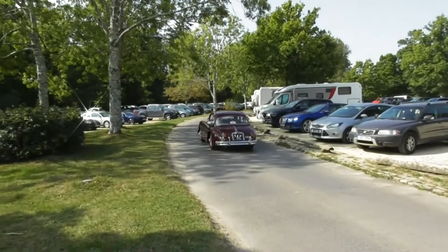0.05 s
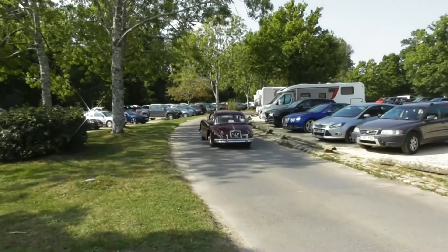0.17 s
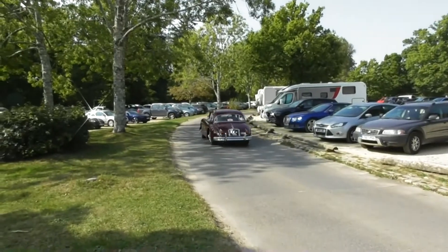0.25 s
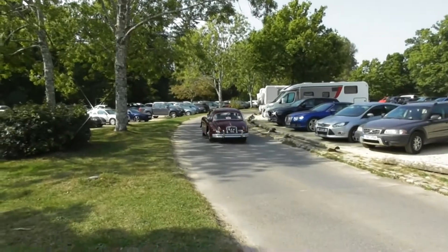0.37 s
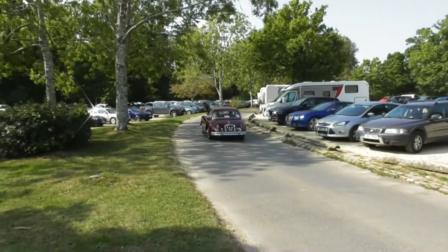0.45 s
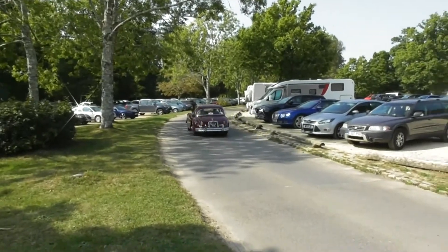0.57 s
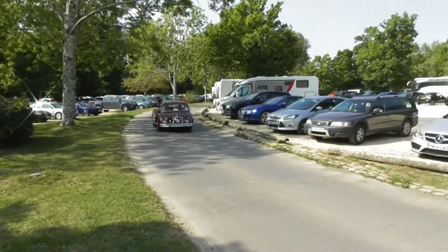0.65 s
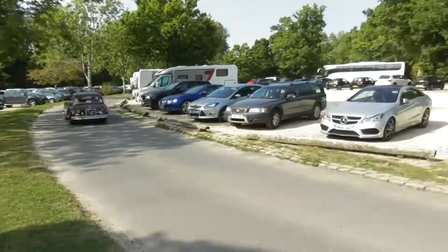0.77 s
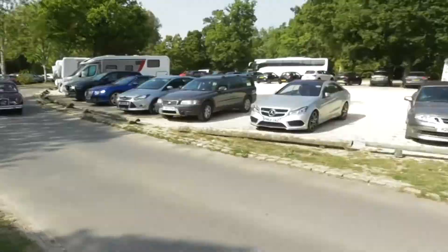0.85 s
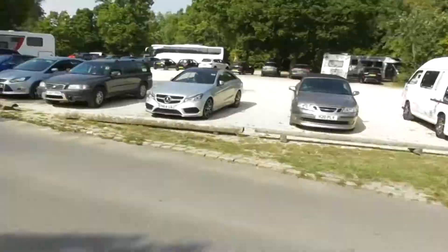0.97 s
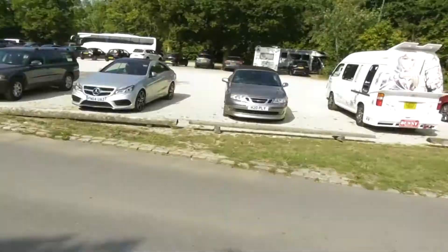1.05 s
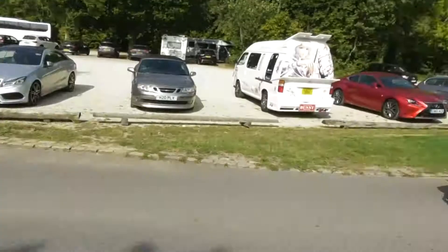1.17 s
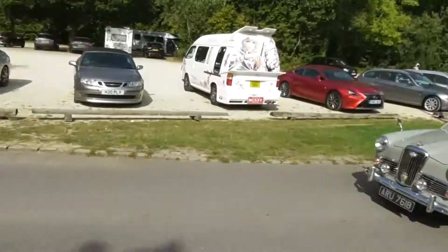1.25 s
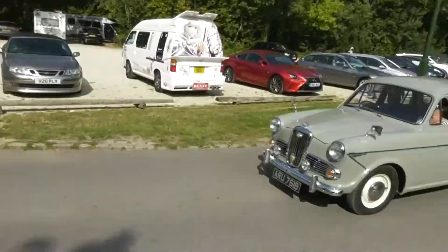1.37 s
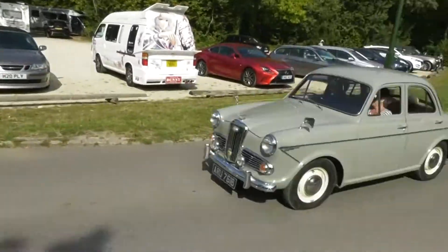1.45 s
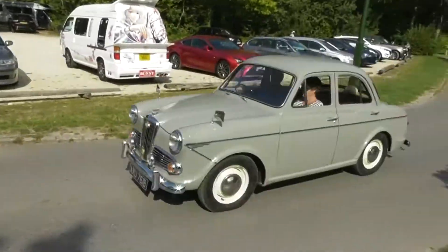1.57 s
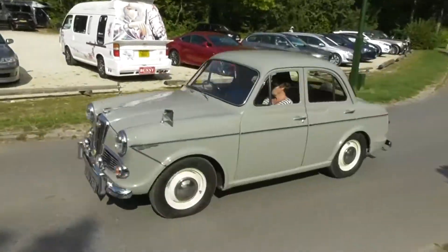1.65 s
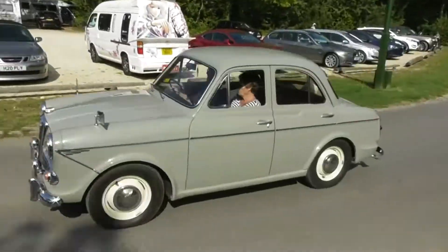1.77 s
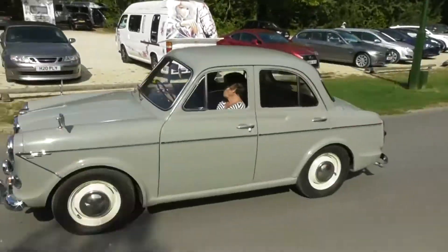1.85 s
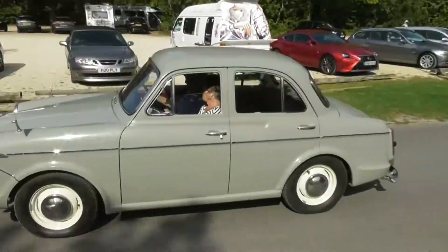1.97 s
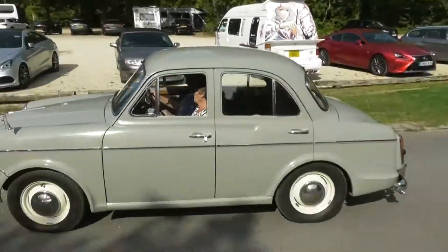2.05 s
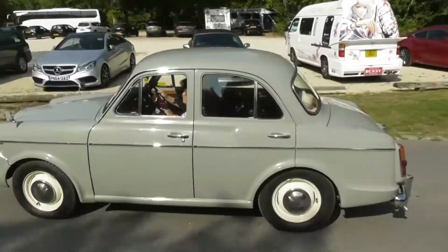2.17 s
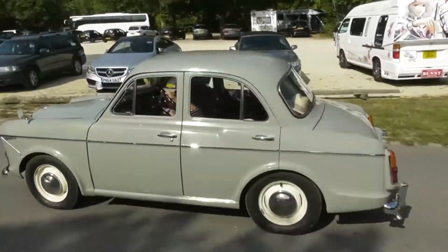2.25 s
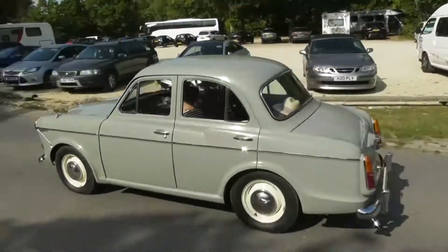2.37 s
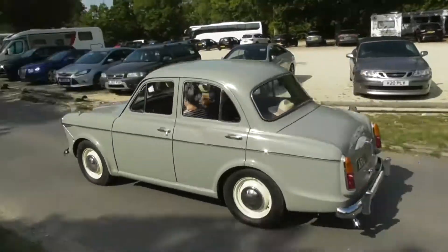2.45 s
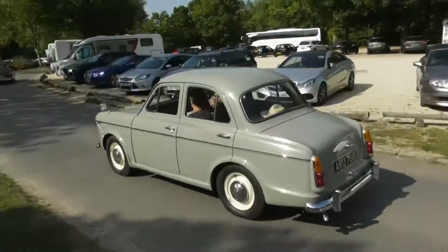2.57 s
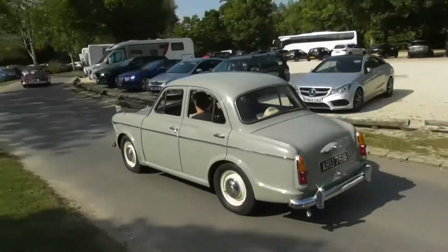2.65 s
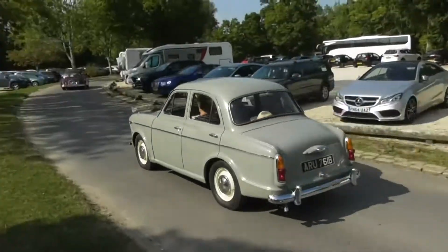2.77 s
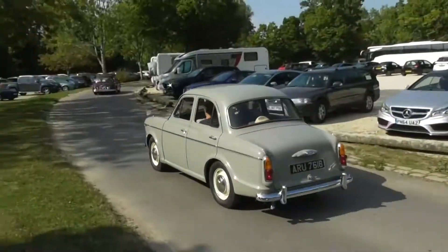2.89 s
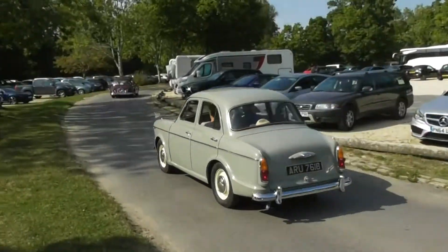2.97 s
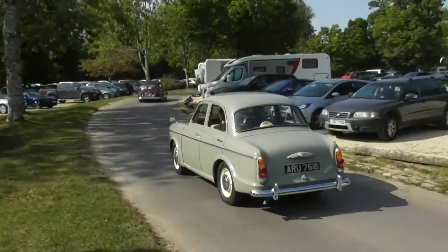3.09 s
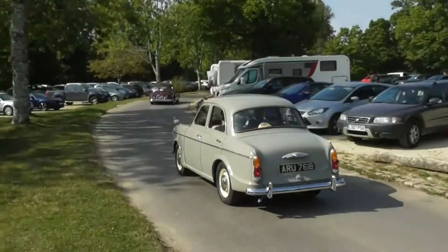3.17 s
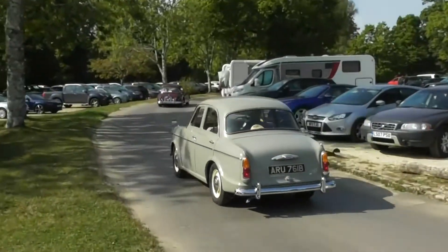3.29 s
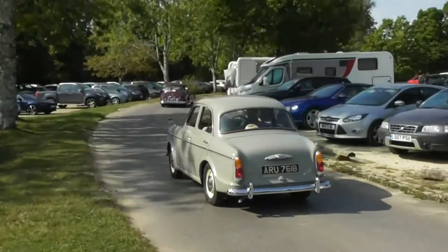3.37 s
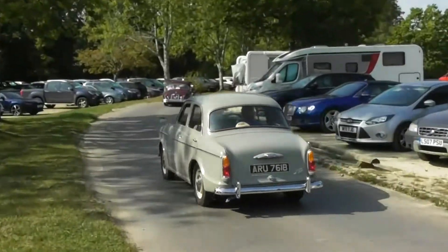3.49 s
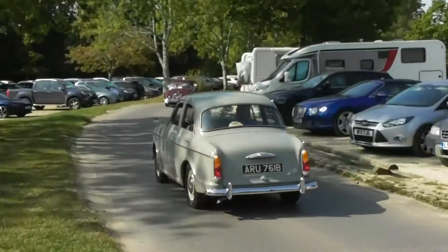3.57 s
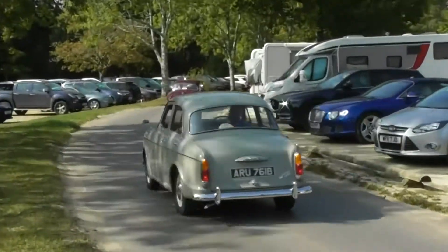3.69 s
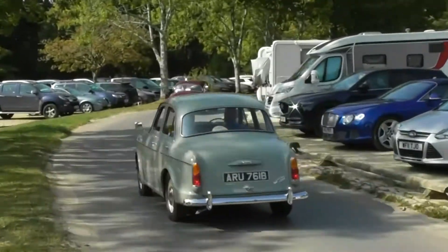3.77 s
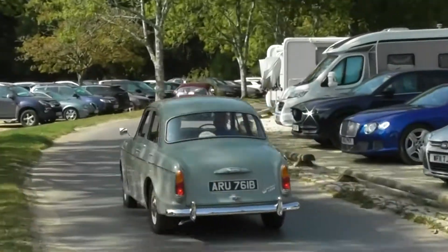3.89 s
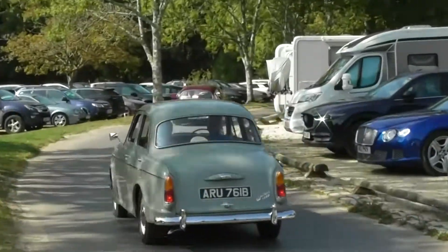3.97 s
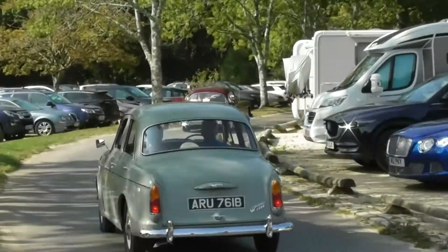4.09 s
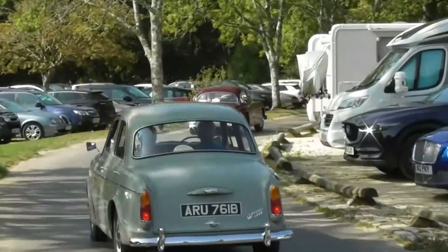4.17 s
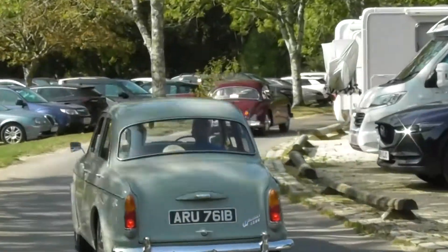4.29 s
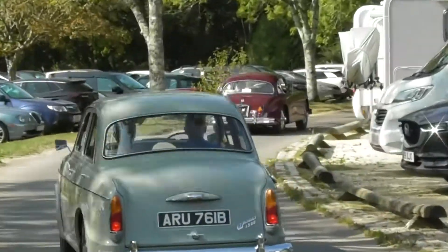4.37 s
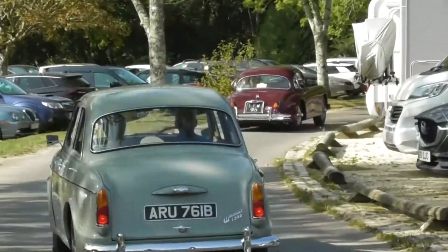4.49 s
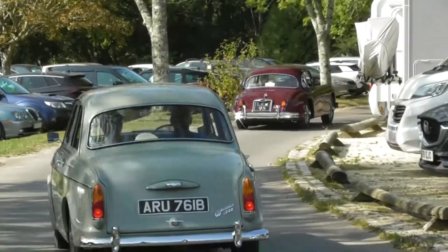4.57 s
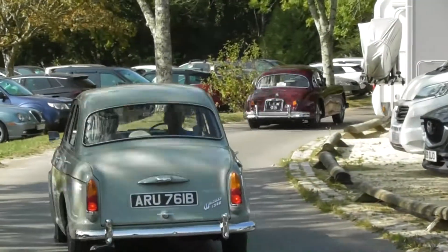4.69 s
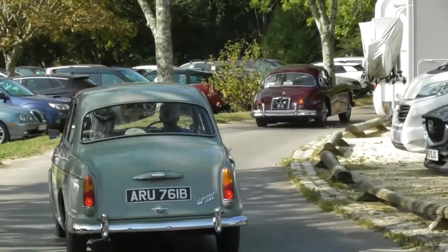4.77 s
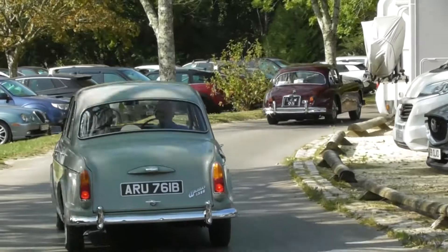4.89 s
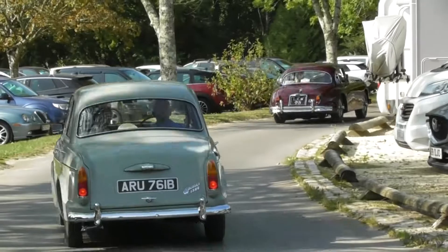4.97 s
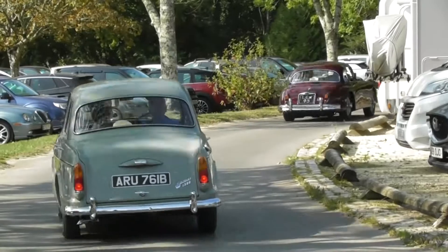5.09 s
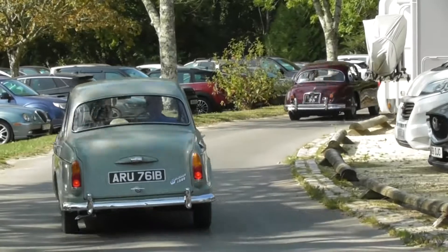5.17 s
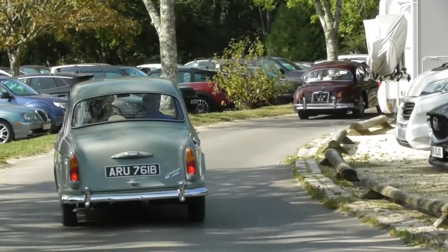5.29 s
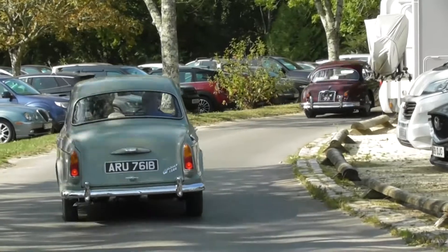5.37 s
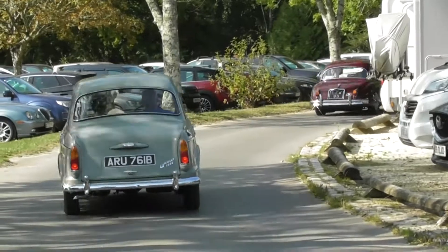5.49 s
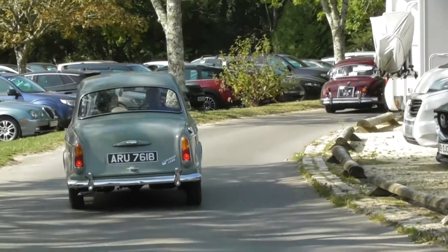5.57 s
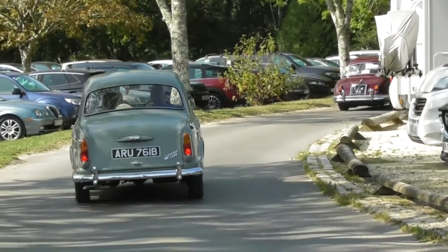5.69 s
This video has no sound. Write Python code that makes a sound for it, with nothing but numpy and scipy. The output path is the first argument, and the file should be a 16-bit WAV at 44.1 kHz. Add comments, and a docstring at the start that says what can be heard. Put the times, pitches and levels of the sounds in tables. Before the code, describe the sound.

A vintage saloon rolls slowly past a stereo microphone beside an outdoor road, its low engine note and tyre noise swelling and fading. A second engine throbs along with it, slowly gaining speed, over far traffic. Once the saloon has gone by, its exhaust spits quick, hissy puffs that gradually recede. Late on, a piece of gravel cracks under a tyre while a third engine revs up farther off.

```python
"""A park road in the open air, stereo microphone at the verge, old cars creeping by over a far drone.
A four-cylinder saloon passes close at idle speed, tyres rushing, fan singing; the microphone swings
round to face it. Once its tail is in view, the leaky exhaust chuffs at every firing. A second engine
slowly gains speed and beats against the first. Dull bumps come from the road early on; near the end
a third engine revs up in the distance and a stone snaps under a tyre."""
import sys
import numpy as np
from scipy import signal
from scipy.fft import rfft, irfft
from scipy.io import wavfile

SR = 44100
rng = np.random.default_rng(int(sys.argv[2]) if len(sys.argv) > 2 else 0)


def int16_out(signal):
    """Quantize to a 16-bit WAV file."""
    q = np.round(np.clip(np.atleast_2d(signal).T, -1, 1) * 32767)
    wavfile.write(sys.argv[1], SR, q.astype(np.int16))


N = 253134
TIME = np.arange(N) / SR
BINS_HZ = np.maximum(np.arange(N // 2 + 1) * SR / N, 1)
TURN_S, TURN_WIDTH_S = 1, .24   # the microphone swings round to the saloon
REAR_S, REAR_WIDTH_S, REAR_SHARE, REAR_FADE_S = 2.326, 0.09, 0.79, 6   # its tail comes into view

# stereo width at the microphone: (frequency [Hz], side minus mid [dB])
STEREO_WIDTH = [(30, -23), (60, -24), (130, -16), (290, -13.5), (640, -10), (1400, -8.5), (3100, -14),
                (5500, -44), (8500, -11.5), (14000, -0.5)]
# engine speeds: (time [s], firing rate [Hz])
SALOON_RATE = [(0, 32.772), (.9085, 33.594), (1.942, 33.331), (2.949, 32.415), (5.74, 32.082)]
SECOND_RATE = [(0, 30.206), (.4, 29.827), (1.109, 30.481), (2.042, 33.059), (3.118, 34.727),
               (4.046, 35.068), (5.74, 34.861)]
# the second car's exhaust from the verge: (time [s], gain [dB])
SECOND_LEVEL = [(0, -36.5), (.7, -40.5), (1.3, -35.5), (1.8, -35.5), (2.12, -30.5), (2.6, -37.5),
                (3.8, -38.3), (5.2, -42.5), (5.74, -50.5)]
# each car's silencer: (frequency [Hz], gain [dB])
SALOON_PIPE = [(33, -24), (66, -23), (100, -19.5), (131, 1), (165, -2), (197, -13.5), (230, -19.5),
               (265, -27.5), (295, -31), (328, -30), (400, -47)]
SECOND_PIPE = [(32, -38), (62, -15), (95, -35.5), (121, -1), (137, -0.5), (150, 1), (177, -7), (208, -10.5),
               (240, -33.5), (272, -9), (305, -28.5), (400, -32.5)]
DISTANT_PIPE = [(55, -16), (70, -9), (88, -6), (115, 4), (145, -7), (175, -9), (205, -28), (228, -1),
                (262, -22), (400, -44)]
# how each part of the saloon passes the microphone:
# (time abreast [s], peak gain [dB], swell [s], fade [s], shade before the turn [dB])
EXHAUST_PASS = (2.5, -32, 0.22, 0.38, 14)
TYRES_PASS = (1.58, -44, 0.74, 0.6244, 6.5)
BAY_PASS = (1.6, -42.5, 0.3, .6, 4)
BODY_PASS = (2, -40.5, 0.96, 0.59, 4)
TREAD_PASS = (1.4, -55, 10, 0.48, 12.5)
LEAK_PASS = (2.5, -46, .52, 0.56, 14.5)
TAIL_PASS = (2.5, -44, 5, 0.25, 0)
# rush, growl and rumble of the cars farther off: (starting gain [dB], fall [dB/s])
FAR_CARS = [(-56.5, 1), (-51, 0.34), (-49.5, 1.5)]
# noise colours: (frequency [Hz], relative density [dB])
FAR_DRONE = [(20, -35), (31, -3), (46, -2.5), (56, -9), (74, -1.5), (80, 7.5), (85, -6.5), (90, 8),
             (98, -5), (140, -3.5), (250, -16), (600, -21.5)]
TYRE_RUSH = [(530, -16), (900, -2.5), (1020, -5), (1430, -3), (2020, -5), (2820, -8.5), (3970, -14.5),
             (5000, -20.5), (6500, -20), (11000, -120)]
TREAD_SIZZLE = [(3800, -15), (4800, 8.5), (6300, 6), (7500, 17), (10000, 6), (12500, 3), (16000, 1)]
BAY_GROWL = [(330, -42), (400, -4.5), (500, 0.5), (600, 2.5), (700, 0), (780, -3), (870, -13), (940, -6),
             (1020, -9.5)]
BODY_RUMBLE = [(100, 6), (130, -0.5), (170, 6.5), (220, 2), (300, 0), (350, -5.5), (390, -11.5),
               (480, -21.5)]
FAN_TONE = [(780, -16), (860, 3), (890, -2.5), (960, -14), (1900, -18), (2700, -12.5), (3400, -31)]
BUMP_TONE = [(270, -13), (320, 1), (400, 1), (450, -14)]
LEAK_DIRECT = [(3500, -38), (4700, -16), (5400, -4), (6500, -4), (7600, 3), (8500, 5), (9400, -6.5),
               (10500, -2.5), (11500, -10), (12500, -14), (16000, -19)]   # straight from the hole
LEAK_SCATTERED = [(3000, -43), (4700, -12), (5400, -5), (6000, -6), (6600, -6), (7600, -1), (8500, -2.5),
                  (9400, -6.5), (10400, -11.5), (11500, -17.5), (12500, -19), (16000, -29)]   # by way of road and body
STONE_RING = [(3500, 2), (4200, -1), (5600, 1), (7000, -2), (8400, 3), (11000, -18), (15000, -37)]
# bumps from the road: (time [s], level [dB], length [s])
BUMPS = [(.56, -49.5, .02), (.625, -40, 0.02), (0.744, -54, .02), (0.816, -51.5, 0.039)]
# each cylinder's puff at the leak: (relative level [dB])
CYLINDERS_DB = [14.1, 9.1, 10.3, 9.2]
# firings that spit harder than the rest: (time [s], extra level [dB])
HARD_PUFFS = [(2.528, 1.5), (2.558, 1.5), (2.651, 2.5), (2.682, 5), (2.805, 4.5), (2.989, 5), (3.02, 3),
              (3.051, 5), (3.39, 2.5), (3.483, 5.5), (3.513, 3.5), (3.576, 3.5), (3.885, 0.5), (5.004, 6),
              (5.035, 6.5), (5.408, 4.5), (5.656, 6.5)]
# underbody and tailpipe resonances from behind: (frequency [Hz], width [Hz], relative level [dB])
TAIL_MODES = [(573, 250, -2.5), (687, 25, 2.5), (970, 66, -3), (1150, 320, -6.5), (1737, 210, -6),
              (1921, 40, -5.5), (2427, 340, -13), (2984, 220, -14.5)]
# a stone crunches, then snaps: (time [s], level before the low cut [dB], decay [s], low cut [Hz])
STONE_BURSTS = [(4.379, -46, 0.0044, 5800), (4.3836, -40, 0.0043, 5500), (4.386, -29.5, 0.0011, 3800)]
# the knock that goes with the snap: (frequency [Hz], level [dB], decay [s])
STONE_KNOCK = [(644, -53, .003), (910, -33, 0.0029), (1260, -36.5, 0.0036), (1950, -35, 0.0021),
               (2440, -32.5, 0.002), (4240, -37, 0.0028)]


def from_db(db):
    """Decibels to gain."""
    return 10 ** (np.asarray(db) / 20)


def rms_one(x):
    """Scale to unit power."""
    return x / np.sqrt(np.mean(x ** 2) + 1e-20)


def in_time(curve):
    """A curve's value at every sample."""
    return np.interp(TIME, *np.transpose(curve))


def at_hz(spectrum, hz):
    """Read a spectrum on a log-frequency axis."""
    points_hz, db = np.transpose(spectrum)
    return np.interp(np.log(hz), np.log(points_hz), db)


def gains(spectrum):
    """Gain at every frequency, falling steeply beyond the spectrum's ends."""
    (low, low_db), (high, high_db) = spectrum[0], spectrum[-1]
    skirted = [(low / 8, low_db - 90), *spectrum, (high * 8, high_db - 90)]
    return from_db(at_hz(skirted, BINS_HZ))


def colour(x, spectrum):
    """Give a signal a spectrum, at unit power."""
    return rms_one(irfft(rfft(x) * gains(spectrum), N))


def wide_noise(spectrum):
    """Coloured stereo noise, nearly mono in the bass."""
    bins = rng.standard_normal((2, len(BINS_HZ), 2)) @ [1, 1j] * gains(spectrum)
    mid, side = irfft([bins[0], bins[1] * from_db(at_hz(STEREO_WIDTH, BINS_HZ))], N)
    return (mid + side * [[1], [-1]]) / np.std(mid)


def drift(rate_hz, step=32):
    """A slow random wander with spread 1."""
    hz = BINS_HZ[:N // step // 2 + 1]
    bins = rng.standard_normal(len(hz)) + 1j * rng.standard_normal(len(hz))
    slow = irfft(bins / (1 + (hz / rate_hz) ** 4))
    return np.interp(np.arange(N) / step, np.arange(len(slow)), rms_one(slow))


def pan(x, right_db):
    """Lean a sound to the right."""
    return x * from_db(np.array([[-.5], [.5]]) * right_db)


def after(s, width_s):
    """A smooth step from 0 to 1."""
    return .5 + .5 * np.tanh((TIME - s) / width_s)


def passing(abreast_s, peak_db, swell_s, fade_s, shade_db):
    """Gain in dB of a part of the saloon: 1 / distance, shaded until the microphone turns to it."""
    along = (TIME - abreast_s) / np.where(TIME < abreast_s, swell_s, fade_s)
    return peak_db - 10 * np.log10(1 + along ** 2) - shade_db * (1 - after(TURN_S, TURN_WIDTH_S))


def rear_view():
    """Share of the tail's sound that arrives straight: opens as the rear goes by, shrinks with range."""
    receding = np.exp((REAR_S - TIME) / REAR_FADE_S)
    return np.clip(REAR_SHARE * after(REAR_S, REAR_WIDTH_S) * receding, 0, 1)


def firings(rate, first_s=0):
    """Running count of an engine's firings."""
    return np.cumsum(rate) / SR - first_s * rate[0]


def far_traffic():
    """Traffic and idling cars drone a long way off."""
    return from_db(-43.5) * wide_noise(FAR_DRONE)


def exhaust(count, rate, pipe, rough, harmonics=12, chamber_hz=178, chamber_width_hz=6):
    """Each firing thumps the silencer: harmonics swell as they slide through the pipe's resonances."""
    uneven = count + rough / 20 * drift(7.6)
    note = 0
    for k in range(1, harmonics + 1):
        # above the chamber's resonance the gas answers half a cycle late
        lag = np.arctan2(chamber_width_hz, chamber_hz - k * rate)
        note = note + from_db(at_hz(pipe, k * rate)) * np.sin(2 * np.pi * k * uneven - lag)
    return np.sqrt(2) * note * (1 + rough * drift(16.0))


def saloon(count, rate):
    """The saloon's exhaust note swells and fades as it idles past, close to the microphone."""
    return from_db(passing(*EXHAUST_PASS)) * exhaust(count, rate, SALOON_PIPE, rough=0.072)


def second_car():
    """A second engine slowly gains speed, its exhaust note beating against the saloon's."""
    rate = in_time(SECOND_RATE)
    note = exhaust(firings(rate, first_s=.0069), rate, SECOND_PIPE, rough=0.073, chamber_hz=173.8)
    return from_db(in_time(SECOND_LEVEL)) * note


def road_gains():
    """Gains of rush, growl and rumble: the close pass on top of the cars farther off."""
    return [np.hypot(from_db(passing(*part)), from_db(start_db - fall * TIME))
            for part, (start_db, fall) in zip((TYRES_PASS, BAY_PASS, BODY_PASS), FAR_CARS)]


def tread_gain(air_loss=1.27):
    """Gain of the treads' finest sounds, which the air dulls with distance."""
    db = passing(*TREAD_PASS)
    return from_db(db.max() + air_loss * (db - db.max()))


def rolling(count, throb=0.028):
    """Tyres rush over gritty asphalt; engine bay and body growl and rumble in step with the firings."""
    rush, growl, rumble = road_gains()
    pulse = 1 + throb * np.cos(2 * np.pi * count)
    texture = from_db(1.1 * drift(62))
    tyres = rush * from_db(-0.3) * wide_noise(TYRE_RUSH)
    sizzle = tread_gain() * wide_noise(TREAD_SIZZLE)
    bay = pan(growl * from_db(-2.5) * wide_noise(BAY_GROWL), right_db=1.5)
    body = pan(rumble * from_db(2.5) * wide_noise(BODY_RUMBLE), right_db=2.5)
    return pan(texture * (tyres + sizzle), right_db=.5) + pulse * (bay + body)


def fan(trim_db=-8.5):
    """The cooling fan sings through the grille, mostly while the nose faces the microphone."""
    _, growl, _ = road_gains()
    facing = 1 - rear_view()
    return facing * growl * from_db(trim_db) * colour(rng.standard_normal(N), FAN_TONE)


def grit(trim_db=-23.0, per_s=900, size_spread_db=8.0):
    """Grains of sand pop under the treads, heard only at close range."""
    hits = rng.random(N) < per_s / SR
    sizes = from_db(size_spread_db * np.minimum(rng.exponential(1, N), 4))
    pops = hits * sizes * rng.choice([-1, 1], N)
    return from_db(trim_db) * tread_gain() * colour(pops, TREAD_SIZZLE)


def bumps():
    """A few soft, hollow bumps from the road."""
    swell = sum(from_db(db) / (1 + ((TIME - s) / length_s) ** 2) ** 2 for s, db, length_s in BUMPS)
    return swell * colour(rng.standard_normal(N), BUMP_TONE)


def leak(count, rate, puff_s=.00095, scatter_s=0.0091, whistle_hz=8150, spread_hz=560, lag_s=.00001):
    """Gas spits through a small hole at each firing: a whistling puff, then scatter off road and body."""
    nth = np.floor(count).astype(int) + 1
    age = count % 1 / rate
    jitter_db, pitch_jitter, length_jitter = rng.uniform(-1.7, 1.7, (nth.max() + 1, 3))[nth].T
    extra_db = np.zeros(nth.max() + 1)
    for s, db in HARD_PUFFS:
        extra_db[round(count[round(s * SR)]) + 1] = db
    cylinder_db = np.array(CYLINDERS_DB)[(nth - 1) % len(CYLINDERS_DB)]
    strength = from_db(cylinder_db + extra_db[nth] + jitter_db)
    rise = age / (puff_s * np.exp(0.2 * length_jitter))
    puff = rms_one(strength * rise ** 3 * np.exp(-1.5 * rise))
    scatter = rms_one(np.sqrt(strength) * (1 - np.exp(-age / puff_s)) * np.exp(-age / scatter_s) + 0.37)
    whistle = np.sqrt(2) * np.sin(2 * np.pi * (whistle_hz + spread_hz * pitch_jitter) * age)
    jet = rms_one(colour(rng.standard_normal(N), LEAK_DIRECT) + 0.71 * whistle)
    # the puff reaches the right microphone port a little earlier
    port_delay = np.exp(1j * np.pi * BINS_HZ * lag_s * np.array([[-1], [1]]))
    direct = np.sqrt(rear_view()) * irfft(rfft(jet * puff) * port_delay, N)
    scattered = np.sqrt(1 - rear_view()) * scatter * wide_noise(LEAK_SCATTERED)
    return from_db(passing(*LEAK_PASS)) * (direct + scattered)


def tailpipe(count, throb=0.11, far_db=-55.5):
    """Pulsing gas flow rings the tailpipe and underbody, heard once the rear faces the microphone."""
    response = sum(from_db(db) / (1 + 1j * (BINS_HZ / hz - hz / BINS_HZ) * hz / width) ** 2
                   for hz, width, db in TAIL_MODES)
    flow = rng.standard_normal(N) * (1 + throb * np.cos(2 * np.pi * count))
    level = np.hypot(from_db(passing(*TAIL_PASS)), from_db(far_db))
    return np.sqrt(rear_view()) * level * rms_one(irfft(rfft(flow) * response, N))


def distant_rev(start_s=4.15, idle_hz=50.1, climb_hz_per_s=26, throttle_db=14, opening_s=0.38):
    """Far off a throttle opens: the engine quickly gets louder, then climbs in speed and level."""
    since = np.maximum(TIME - start_s, 0)
    rate = idle_hz + climb_hz_per_s * since
    throttle = np.minimum(since / opening_s, 1)
    gain_db = -66 + throttle_db * throttle + 5 * since   # from a faint idle
    return from_db(gain_db) * exhaust(firings(rate), rate, DISTANT_PIPE, rough=0.25, harmonics=5)


def stone():
    """A piece of gravel cracks under a tyre in three quick bursts; the last one knocks."""
    crunch = colour(rng.standard_normal(N), STONE_RING)
    out = np.zeros(N)
    age = TIME[:SR // 20]
    for s, db, decay_s, low_hz in STONE_BURSTS:
        span = slice(round(s * SR), round(s * SR) + len(age))
        burst = from_db(db) * crunch[span] * np.exp(-age / decay_s)
        out[span] += signal.sosfilt(signal.butter(2, low_hz, "high", fs=SR, output="sos"), burst)
    for hz, db, decay_s in STONE_KNOCK:
        out[span] += from_db(db) * np.sin(2 * np.pi * hz * age) * np.exp(-age / decay_s)
    return out


def scene():
    """The road from the verge: the saloon close by, the other cars beyond, leaning a little right."""
    rate = in_time(SALOON_RATE)
    count = firings(rate, first_s=.0063)
    lead_s = .0037   # the leak opens just before the exhaust pulse peaks
    lows = saloon(count, rate) + second_car() + far_traffic()
    chuffs = leak(count + lead_s * rate, rate) + tailpipe(count)
    lows += distant_rev() + bumps()
    return pan(lows, right_db=2.0) + pan(chuffs, right_db=.8) + rolling(count) + fan() + grit() + stone()


def record(dry, cutoff_hz=16000):
    """The top of the treble is cut steeply."""
    return irfft(rfft(dry) / (1 + (BINS_HZ / cutoff_hz) ** 200), N)


dry = scene()
out = record(dry)
int16_out(out)
```